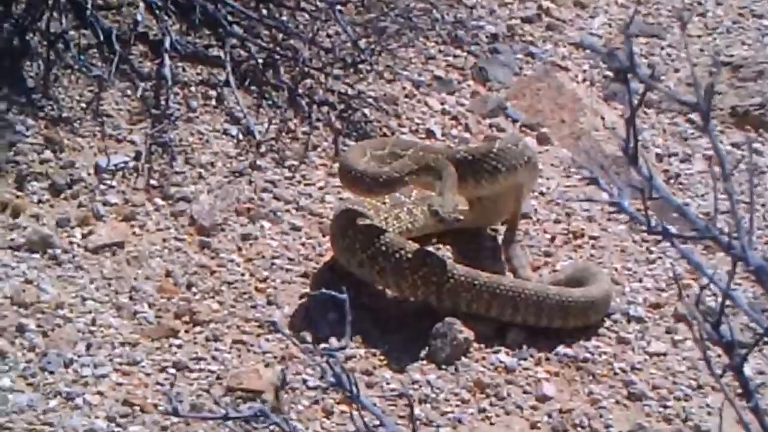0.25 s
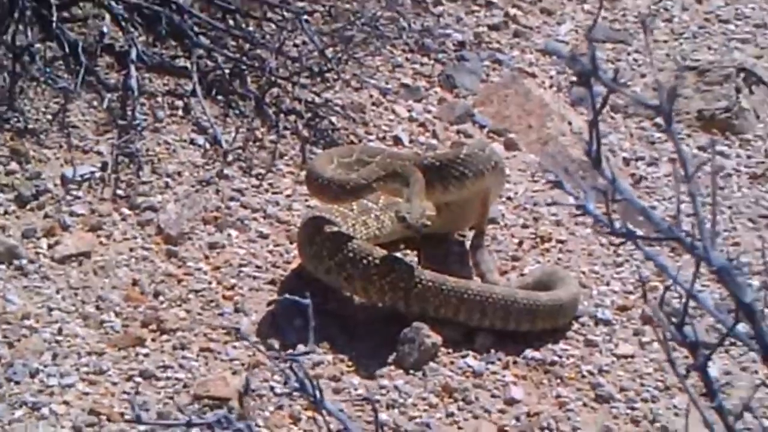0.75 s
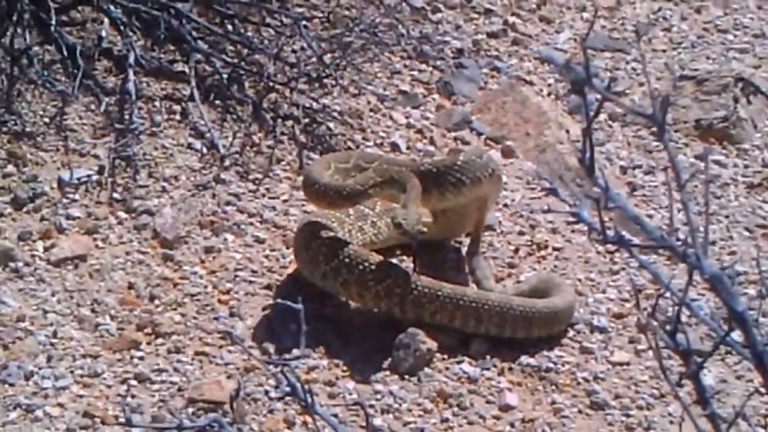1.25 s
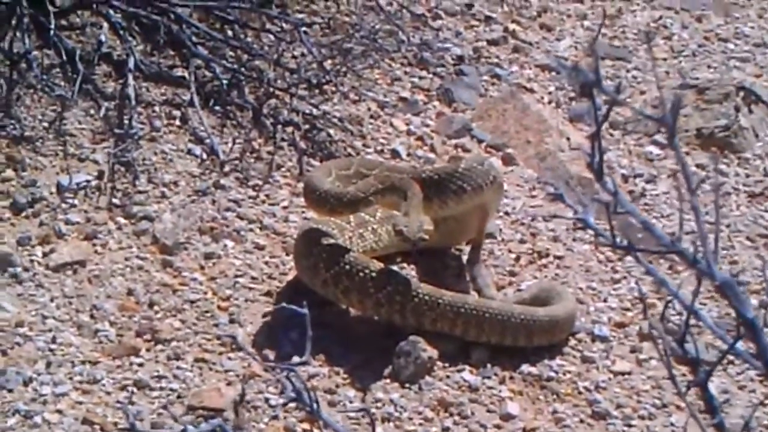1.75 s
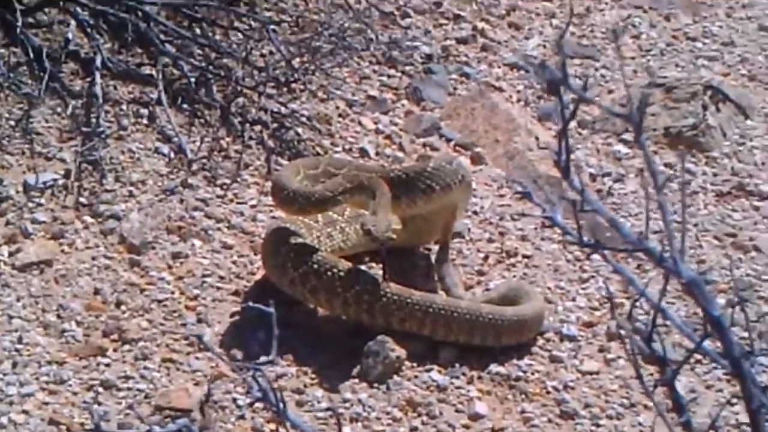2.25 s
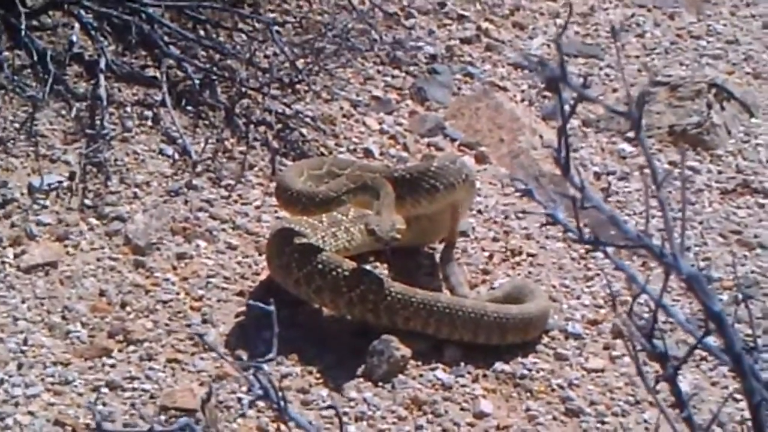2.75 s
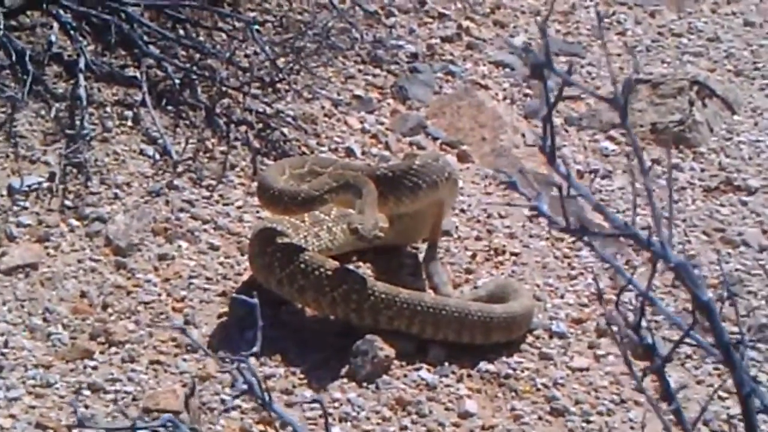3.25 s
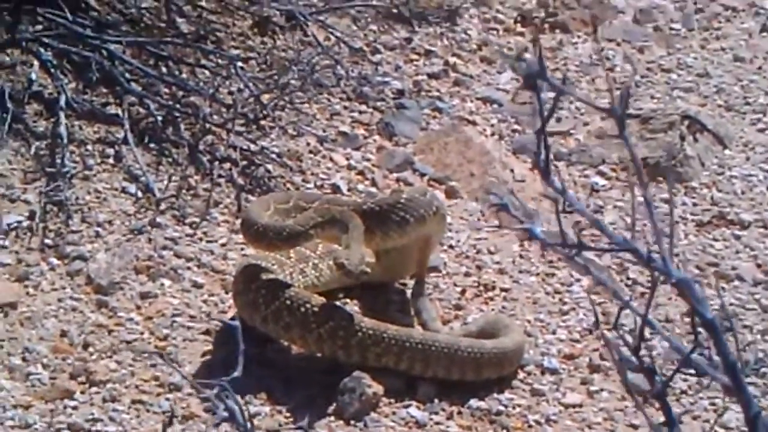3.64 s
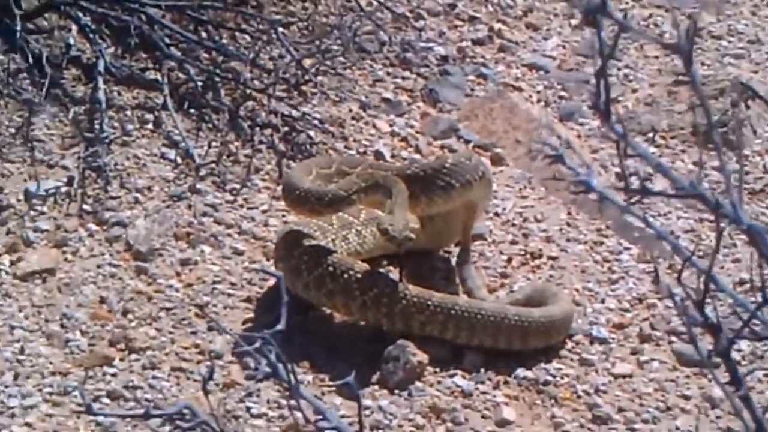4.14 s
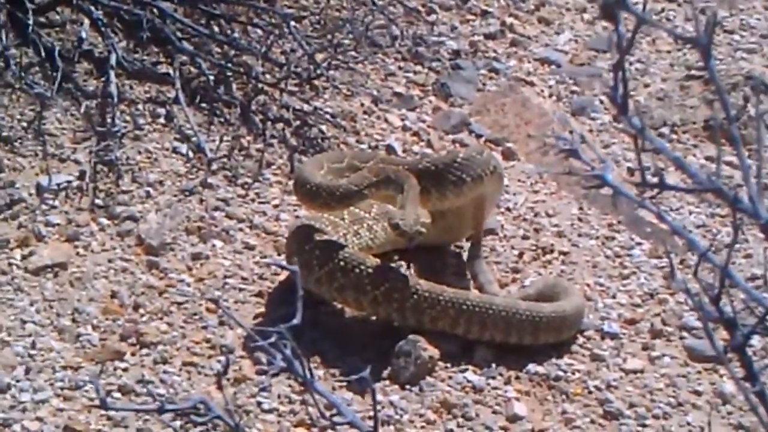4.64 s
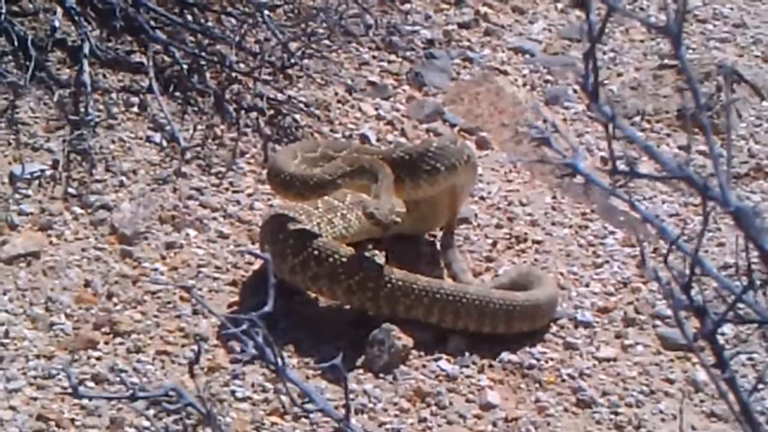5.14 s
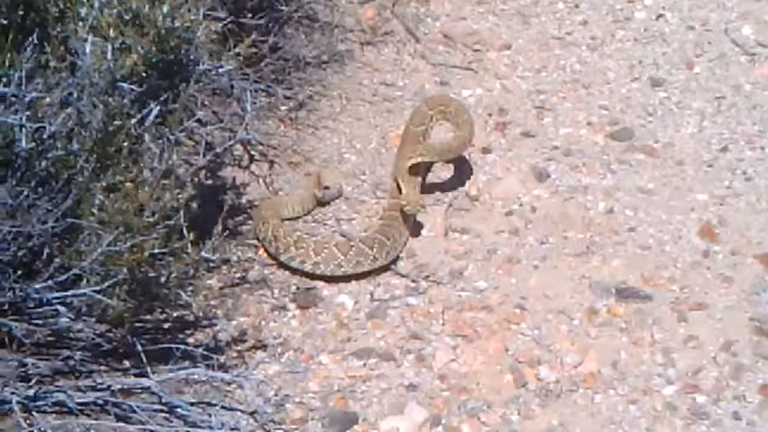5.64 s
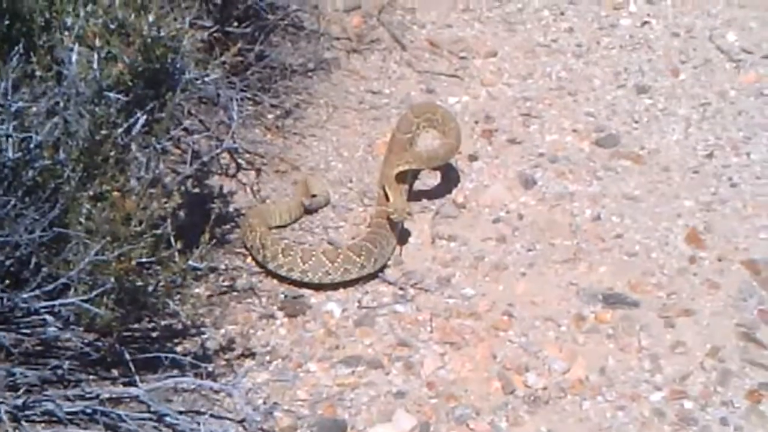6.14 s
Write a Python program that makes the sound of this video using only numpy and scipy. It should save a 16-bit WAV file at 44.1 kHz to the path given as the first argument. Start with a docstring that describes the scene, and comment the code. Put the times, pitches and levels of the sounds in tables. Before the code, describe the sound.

A rattlesnake's dry, high buzz runs without pause close by on open gravel, while gusts of wind thump low against the microphone.

```python
"""Open gravel: a rattlesnake buzzes close by; the rattle's colour shifts twice, gently near 0.5 s and abruptly
at 5.57 s. Its tail swings about 74 times a second and the hollow segments strike four times a swing, each
strike a shower of tiny random clicks. A light wind buffets the microphone in gusts of low puffs, falling sine
swings with a rough noise edge over rumbling noise. The hand-held case knocks (short sines dropping in pitch)
and rustles (uneven noise)."""
import sys
import numpy as np
from scipy import signal
from scipy.fft import rfft, irfft, next_fast_len
from scipy.io import wavfile
from scipy.ndimage import uniform_filter1d, map_coordinates

SR = 44100
rng = np.random.default_rng(int(sys.argv[2]) if len(sys.argv) > 2 else 0)


def store_wav(level_fs):
    """Save 16-bit WAV to argv[1]."""
    pcm = np.round(np.clip(np.atleast_2d(level_fs), -1, 1) * 32767)
    wavfile.write(sys.argv[1], SR, pcm.T.astype(np.int16))


N = 282019
START_S = 0.1066  # silence before this


def amp(db):
    """Turn dB into gain."""
    return 10 ** (np.asarray(db) / 20)


def unit(x):
    """Scale to rms 1."""
    return x / np.sqrt(np.mean(x ** 2) + 1e-20)


def clock():
    """Time of every sample, in seconds."""
    return np.arange(N) / SR


def noise():
    """White noise over the whole scene."""
    return rng.standard_normal(N)


def curves(rows):
    """One curve over the scene for each column after the time."""
    times, *columns = np.transpose(rows)
    return [np.interp(clock(), times, column) for column in columns]


def wobble(rate):
    """A smooth random curve with `rate` knots a second."""
    knots = rng.standard_normal(int(N * rate / SR) + 4)
    return map_coordinates(knots, [np.arange(N) * rate / SR])


def coloured(x, points, narrow=()):
    """Minimum-phase filter with gain (Hz, dB) on a log axis, plus narrow (Hz, width Hz, dB) bumps."""
    size = 4096
    hz = np.fft.rfftfreq(size, 1 / SR)
    point_hz, point_db = np.transpose(points)
    gain_db = np.interp(np.log(hz + 1), np.log(point_hz + 1), point_db)
    for centre_hz, width_hz, bump_db in narrow:
        gain_db += bump_db * np.exp(-((hz - centre_hz) / width_hz) ** 2)
    # folding the cepstrum forward in time makes the filter causal
    cepstrum = irfft(np.log(np.maximum(amp(gain_db), 1e-4)))
    cepstrum[1:size // 2] *= 2
    cepstrum[size // 2 + 1:] = 0
    impulse = irfft(np.exp(rfft(cepstrum)))
    return signal.fftconvolve(x, impulse)[:len(x)]


def click_shower(at, db):
    """Random clicks whose strength leaps at each strike and dies away as the segments settle."""
    settle_s, clicks_per_s = .0021, 26000
    blows = np.bincount(at, amp(db), N)[:N]
    force = signal.lfilter([1], [1, -np.exp(-1 / (settle_s * SR))], blows)
    force += amp(-6)  # some clatter never stops between strikes
    clicks = (rng.random(N) < clicks_per_s / SR) * rng.uniform(-1, 1, N)
    return unit(uniform_filter1d(force, size=45) * clicks)


def patchy(x, depth_db):
    """Narrow parts of the spectrum swell and fade slowly at random."""
    spectrum = signal.stft(x, nperseg=512)[2]
    field = uniform_filter1d(rng.standard_normal(spectrum.shape), size=2, axis=0)
    field = uniform_filter1d(field, size=50, axis=1)
    return signal.istft(spectrum * amp(depth_db * unit(field)), nperseg=512)[1][:N]


# tail, slowing slightly: (t/s, rate/swings a second, level/dB)
TAIL_SWING = [(0.11, 75.9, -39.5), (0.39, 75.9, -34.5), (0.58, 75.9, -37), (1.16, 75.9, -35),
              (1.3, 73.8, -36), (2.1, 73.8, -35), (3.61, 74.0, -35), (3.73, 73.0, -35), (5.56, 73.0, -34),
              (5.58, 71, -40), (5.74, 71.0, -38.5), (5.88, 71.0, -40.5), (6.14, 70.9, -38.5),
              (6.21, 110, -38.5), (6.39, 48, -38.5)]
# relative strikes within a swing: (share of the swing, wide segments level/dB, middle level/dB, narrow level/dB)
SWING_STRIKES = [(0, .5, -5, -13), (.26, -5, -1.5, 0), (.49, 3.5, 1.5, 3.5), (.73, -6, -.5, -4)]
# bands of the wide, middle and narrow segments: (from f/Hz, to f/Hz, lag/swings)
SEGMENT_BANDS = [(0, 7900, 0), (7900, 12000, .08), (12000, 22050, .1)]
# level of the narrow segments against the others: (t/s, level/dB)
TOP_LEVEL = [(0.11, 2.5), (0.7, -3.5), (2, -1.5), (5.55, 0), (5.6, -2.5), (6.39, -2.5)]
# relative colour of the rattle in each of three stretches: (f/Hz, level/dB)
FIRST_COLOUR = [(760, -107), (1300, -48), (2040, -19.5), (2560, -28.5), (3250, -6.5), (4220, -3),
                (5040, -6), (5770, -5.5), (9620, -5.5), (11500, -1.5), (12600, -16.5), (14600, -11),
                (15700, -24)]
SECOND_COLOUR = [(760, -53.5), (1300, -30), (1500, -26), (2140, -17), (2530, -26), (3250, -3), (4590, -4.5),
                 (5480, 1.5), (6960, -11), (7890, -14), (9420, -1.5), (11000, 0), (12100, -9),
                 (13200, -4.5), (15700, -17)]
THIRD_COLOUR = [(760, -26.5), (1300, -22.5), (1800, -32), (2040, -23.5), (2350, -21.5), (3220, -16.5),
                (4270, -11), (4540, -5.5), (5890, 0.5), (6470, -6.5), (7810, -10.5), (8490, -15),
                (10200, -2.5), (11400, -9.5), (15700, -13)]
# narrow peaks and dips in the rattle's colour, one list a stretch: (f/Hz, width f/Hz, level/dB)
COLOUR_DETAIL = [
    [(5500, 340, 5), (6200, 140, 7), (7300, 140, 7), (9600, 440, 7), (10200, 200, 1.5)],
    [(3730, 260, -0.5), (5610, 27.4, -11), (7400, 62, -3), (7415, 120, 7.5), (7860, 170, -1.5),
     (9980, 310, -3), (10950, 100, 0.5)],
    [(1814, 71, 15.5), (3040, 430, -4.5), (3680, 230, 4), (5850, 340, -9.5), (6300, 100, 1.5),
     (8260, 160, -10), (14000, 120, -6)],
]
# crossfades from one colour of the rattle to the next: (start t/s, end t/s)
COLOUR_CHANGES = [(0.5, 0.59), (5.565, 5.569)]


def rattle():
    """A wave runs down the tail: wide segments sound low and first, narrow ones high and a little later."""
    swings_per_s, level_db = curves(TAIL_SWING)
    turn = np.cumsum(swings_per_s * (1 + .003 * wobble(12))) / SR  # swings done so far
    share, *strength_db = np.transpose(SWING_STRIKES)
    when = np.arange(int(turn[-1]))[:, None] + share
    when = when + .02 * rng.standard_normal(when.shape)
    shared_scatter_db = .9 * rng.standard_normal(when.shape)
    hz = np.fft.rfftfreq(N, 1 / SR)
    bands = []
    for (low_hz, high_hz, lag), db in zip(SEGMENT_BANDS, strength_db):
        at = np.interp(when + lag, turn, np.arange(N)).astype(int).ravel()
        own_scatter_db = 0.6 * rng.standard_normal(when.shape)
        clicks = click_shower(at, (db + shared_scatter_db + own_scatter_db).ravel())
        in_band = (hz >= low_hz) & (hz < high_hz)
        bands.append(irfft(rfft(clicks) * in_band, N))
    wide, middle, narrow = bands
    clatter = wide + middle + amp(curves(TOP_LEVEL)[0]) * narrow
    colours = (FIRST_COLOUR, SECOND_COLOUR, THIRD_COLOUR)
    first, second, third = (unit(coloured(clatter, c, d)) for c, d in zip(colours, COLOUR_DETAIL))
    to_second, to_third = (np.interp(clock(), move, [0, 1]) for move in COLOUR_CHANGES)
    heard = (1 - to_second) * first + (to_second - to_third) * second + to_third * third
    return amp(level_db) * patchy(heard, depth_db=1.25)


# gusts, each a run of small random puffs: (start t/s, end t/s, typical puff level/dB)
PUFF_GUSTS = [(.15, .22, -44), (.26, 0.329, -36), (0.545, .66, -44.5), (.77, .86, -46),
              (1.118, 1.318, -41.5), (1.515, 1.737, -25), (1.73, 1.78, -36), (1.793, 1.987, -24.5),
              (2.047, 2.198, -45), (2.324, 2.463, -42.5), (2.64, 2.775, -42.5), (2.91, 3.023, -46),
              (3.198, 3.335, -35), (3.378, 3.496, -33), (3.532, 3.7, -31.5), (3.75, 3.83, -38.5),
              (3.879, 4.079, -34.5), (4.3, 4.511, -33), (4.57, 4.65, -54), (4.85, 5.17, -32),
              (5.19, 5.24, -40), (5.508, 5.58, -33), (5.593, 5.84, -45), (5.84, 6.02, -41.5),
              (6.292, 6.36, -36)]
PUFFS_PER_S = 45
GUST_EDGE_S, SIZE_SCATTER_DB = 0.0067, 2
SMALL_EDGE_DB, EDGE_SCATTER_DB = -26, 5  # against the puff, before the lift all edges get
SMALL_LENGTH_S, LENGTH_SCATTER = 0.0065, 0.27  # typical length, spread in natural log


def small_puffs():
    """Eddies pass at a jittered rate; those inside a gust are heard, with random size, edge and length."""
    count = int((N / SR - START_S) * PUFFS_PER_S)
    s = START_S + (np.arange(count) + rng.random(count)) / PUFFS_PER_S
    size, edge, length = rng.standard_normal((count, 3)).T
    start, end, db = np.transpose(PUFF_GUSTS)[:, :, None]
    inside = np.clip(np.minimum(s - start, end - s) / GUST_EDGE_S + .5, 0, 1)
    gain = (amp(db) * inside).sum(axis=0) * amp(SIZE_SCATTER_DB * size)
    peak_db = 20 * np.log10(gain + 1e-9)
    edge_db = SMALL_EDGE_DB + EDGE_SCATTER_DB * edge
    length_s = SMALL_LENGTH_S * np.exp(LENGTH_SCATTER * length)
    return np.transpose([s, peak_db, edge_db, length_s])[gain > 0]


# wind between the puffs: (t/s, level/dB)
BREEZE_LEVEL = [(0.11, -56), (0.3, -62), (1.49, -63), (1.75, -62), (2.07, -52.5), (3.0, -59), (3.61, -47.5),
                (4.29, -67), (4.41, -46.5), (5.09, -56.5), (5.3, -62.5), (5.64, -51.5), (6.39, -52)]
# strongest puffs, levels before the bass cut, edge against the puff and before its lift:
# (peak t/s, level/dB, sharp edge level/dB, length t/s)
STRONG_PUFFS = [(0.131, -24, -32, 0.015), (0.573, -36, -27.5, 0.021), (0.687, -30.5, -24.5, 0.0048),
                (0.706, -30.5, -21.5, 0.012), (1.215, -28, -30.5, 0.0074), (1.235, -35, -20.5, 0.021),
                (1.528, -21, -16, 0.014), (1.56, -11.5, -15, 0.024), (1.63, -13.5, -12, 0.02),
                (1.649, -10, -19, 0.0037), (1.673, -19.5, -9.5, 0.009), (1.698, -14.5, -30, 0.0073),
                (1.717, -20.5, -23.5, 0.0066), (1.765, -25.5, -30, 0.0076), (1.813, -19, -22.5, 0.014),
                (1.844, -12.5, -14.5, 0.008), (1.884, -23, -10, 0.0062), (1.9, -15.5, -11, 0.01),
                (1.925, -10.5, -22.5, 0.0063), (1.953, -16.5, -17.5, 0.013), (2.085, -40, -21.5, 0.01),
                (2.35, -29.5, -29, 0.0089), (2.388, -28.5, -33.5, 0.0078), (2.456, -34.5, -12.5, 0.018),
                (2.655, -29.5, -25, 0.013), (2.938, -28.5, -21.5, 0.015), (3.21, -32.5, -26, 0.01),
                (3.402, -22, -20.5, 0.022), (3.466, -25, -34, 0.013), (3.554, -29.5, -21, 0.021),
                (3.587, -24.5, -26.5, 0.011), (3.716, -12.5, -14, 0.0086), (3.776, -28.5, -18.5, 0.0091),
                (4.295, -29.5, -29.5, 0.012), (4.384, -20.5, -17.5, 0.0032), (4.434, -20, -31, 0.015),
                (4.458, -24, -17, 0.0094), (4.479, -22.5, -21.5, 0.0054), (4.578, -21, -34, 0.0058),
                (4.639, -19.5, -20, 0.0081), (4.854, -24, -25.5, 0.013), (4.877, -17.5, -20, 0.0085),
                (4.929, -28.5, -19.5, 0.007), (5.053, -25, -18, 0.027), (5.086, -23.5, -19.5, 0.0086),
                (5.553, -29, -25.5, 0.0071), (5.949, -35, -30, 0.031), (6.248, -31, -35.5, 0.013),
                (6.303, -34, -30, 0.007)]
# relative colour of the wind's rumble: (f/Hz, level/dB)
RUMBLE_COLOUR = [(15, -63), (25, -40.5), (94, -4.5), (151, -1), (271, -14), (383, -21.5), (432, -26),
                 (900, -47), (1170, -65), (1980, -120)]
# relative colour of a puff's rough edge: (f/Hz, level/dB)
EDGE_COLOUR = [(200, -25.5), (400, 5), (500, 3), (800, -11), (1200, -22), (1800, -39), (3000, -68)]
# the rough edge comes first, rises fast, dies slower: shares of the puff's length
EDGE_LEAD, EDGE_RISE, EDGE_FALL = 0.23, 0.33, 0.55
EDGE_LIFT_DB = 2.5
WAKE_DB, WAKE_RISE_S, WAKE_FALL_S = -16.5, 0.0078, 0.011  # rumble stirred by a puff, against its peak


def wind():
    """Each puff is a few uneven pressure swings with a rough, brighter edge; its wake stirs up the rumble."""
    lumps = amp(5.0 * wobble(25) + 2.45 * wobble(55))
    rumble = unit(lumps * coloured(noise(), RUMBLE_COLOUR))
    rough = unit(coloured(noise(), EDGE_COLOUR))
    pitch_wander = np.exp(0.3474 * wobble(170))
    now = clock()
    buffets, wake = np.zeros(N), np.zeros(N)
    for s, db, edge_db, length in np.vstack([small_puffs(), STRONG_PUFFS]):
        near = slice(round((s - .05) * SR), round((s + 0.15) * SR))
        t = now[near] - s
        swell = 1 / np.cosh(t / np.where(t < 0, 0.33 * length, 0.32 * length))
        # sharper puffs swing faster; the eddy slows as it passes, so the pitch falls
        pitch_hz = 165 * np.exp(.025 * (edge_db + 30) - 12 * t) * pitch_wander[near]
        swing = np.sin(2 * np.pi * (rng.random() + np.cumsum(pitch_hz) / SR))
        ahead = t / length + EDGE_LEAD
        edge_swell = np.exp(-(ahead / np.where(ahead < 0, EDGE_RISE, EDGE_FALL)) ** 2)
        edge = amp(edge_db + EDGE_LIFT_DB) * edge_swell * rough[near]
        buffets[near] += amp(db) * (swell * swing + edge)
        wake[near] += amp(db + WAKE_DB) / np.cosh(t / np.where(t < 0, WAKE_RISE_S, WAKE_FALL_S))
    bass_cut = signal.butter(3, 95, "high", fs=SR, output="sos")
    rumble_level = wake + amp(curves(BREEZE_LEVEL)[0])
    return signal.sosfilt(bass_cut, buffets) + rumble_level * rumble


# knocks on the case, level before the fade: (t/s, level/dB, ringing f/Hz, starting f/Hz, length t/s)
CASE_KNOCKS = [(.438, -25, 367, 1680, 0.0028), (1.029, -40, 550, 800, 0.0022),
               (1.091, -22, 320, 1210, 0.0037), (1.455, -34.5, 353, 910, 0.0031),
               (4.19, -40.5, 282, 694, 0.0041)]


def knocks():
    """Short dull knocks of the plastic case, each a sine dropping fast in pitch as it dies."""
    out, t = np.zeros(N + SR), np.arange(SR // 20) / SR
    for s, db, hz, start_hz, length in CASE_KNOCKS:
        pitch_hz = hz + (start_hz - hz) * np.exp(-t / 0.0013)
        ring = np.sin(2 * np.pi * np.cumsum(pitch_hz) / SR)
        attack = 1 - np.exp(-(start_hz * t / 0.3) ** 2)
        fade = np.exp(-(t / length) ** 2)
        out[round(s * SR):][:len(t)] += amp(db) * attack * fade * ring
    return out[:N]


# fingers slide on the case: (start t/s, end t/s, level/dB)
FINGER_SLIDES = [(0.455, 0.525, -47.5), (0.601, 0.635, -45.5)]
# relative colour of skin on the case: (f/Hz, level/dB)
SKIN_COLOUR = [(300, -9), (700, -6), (1500, -3.5), (2500, -5), (4000, -14.5)]


def rustles():
    """Fingers rub over the case: unevenly gritty noise, faded in and out."""
    now = clock()
    slide = sum(amp(db) * (now > start) * (now < end) for start, end, db in FINGER_SLIDES)
    grit = noise() * amp(3 * wobble(300))
    return uniform_filter1d(slide, size=700) * unit(coloured(grit, SKIN_COLOUR))


def scene():
    """Snake, wind and hand at one microphone."""
    return (rattle() + wind() + knocks() + rustles())[None]


# relative colour of the microphone's hiss: (f/Hz, level/dB)
HISS_COLOUR = [(100, -19), (400, 1), (1000, 1.5), (2000, -5), (3500, 1.5), (8000, -25)]
TOP_HZ = 15750


def record(dry):
    """Microphone hiss, a silent lead-in, nothing above the band limit."""
    hiss = amp(-64) * unit(coloured(noise(), HISS_COLOUR))
    opened = np.clip((clock() - START_S) / .002, 0, 1)
    size = next_fast_len(N + SR)
    in_band = np.fft.rfftfreq(size, 1 / SR) < TOP_HZ
    return irfft(rfft((dry + hiss) * opened, size) * in_band, size)[:, :N]


dry = scene()
out = record(dry)
store_wav(out)
```